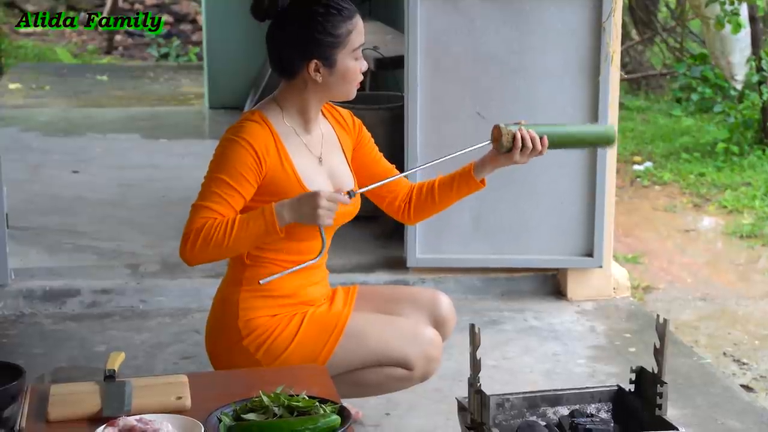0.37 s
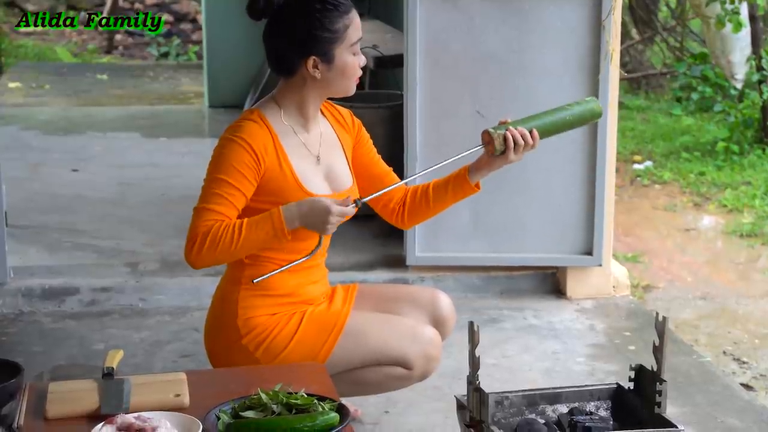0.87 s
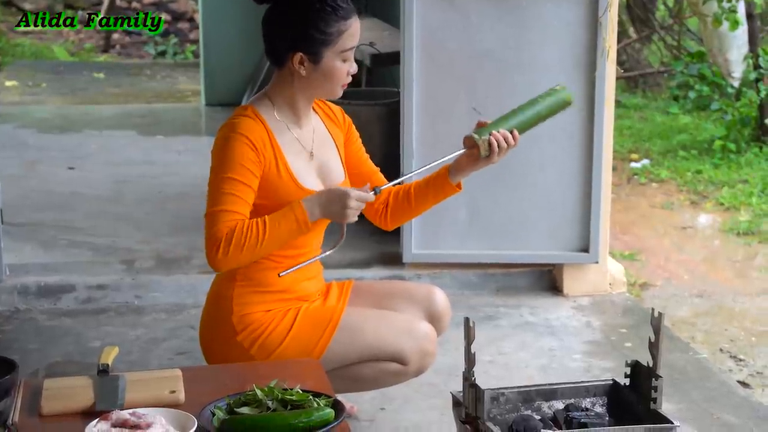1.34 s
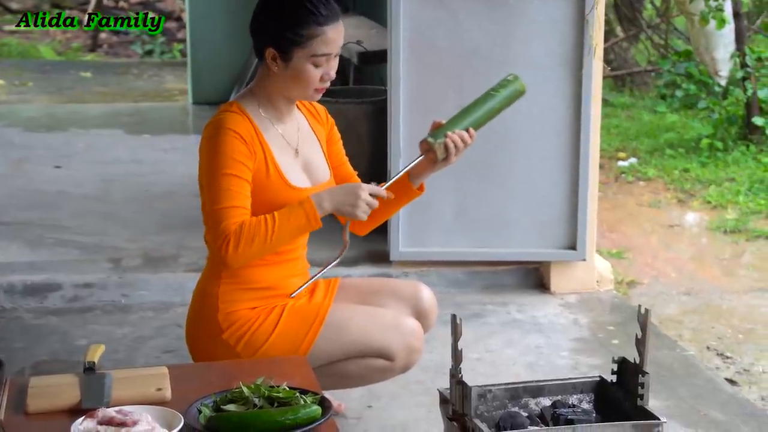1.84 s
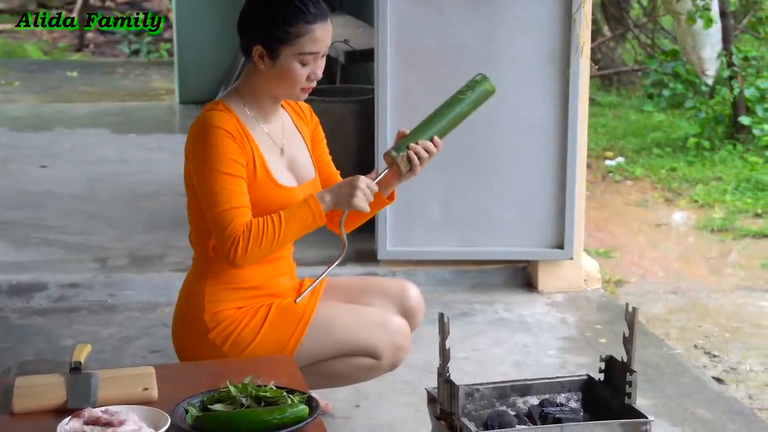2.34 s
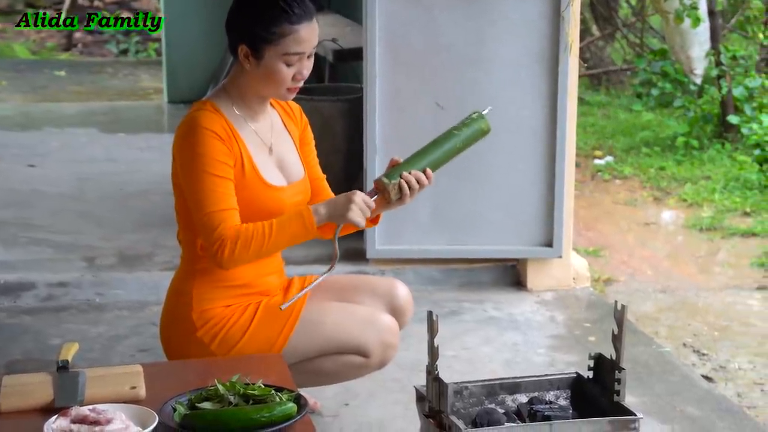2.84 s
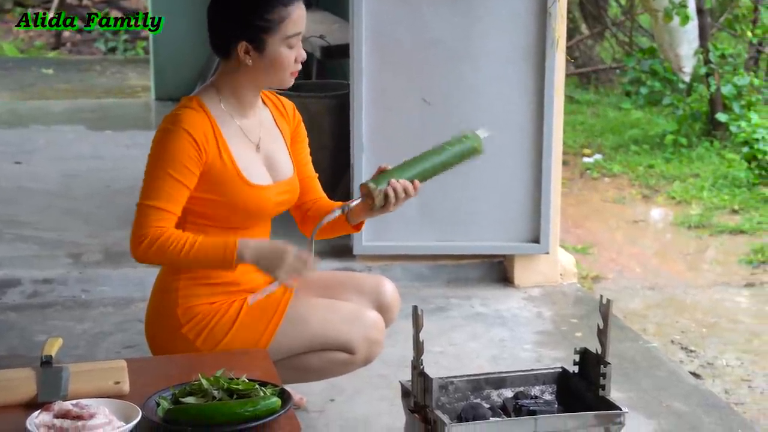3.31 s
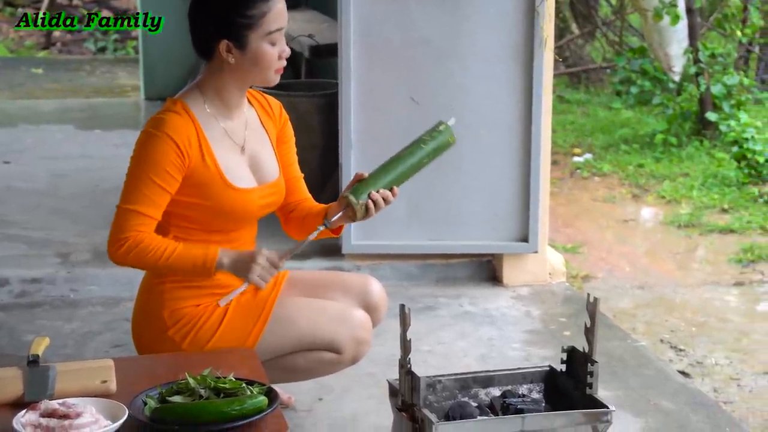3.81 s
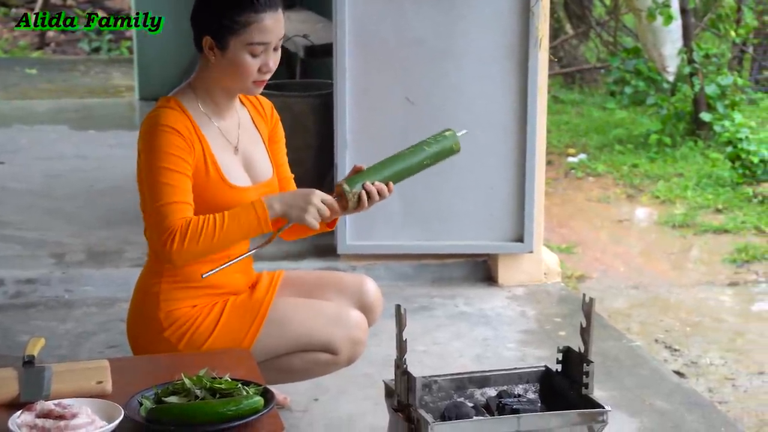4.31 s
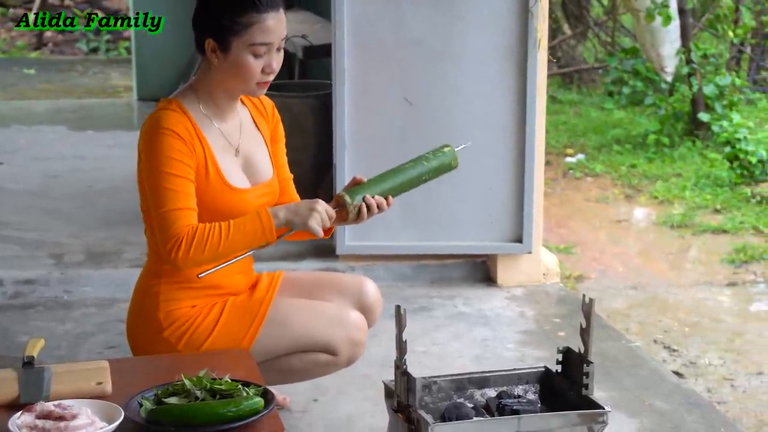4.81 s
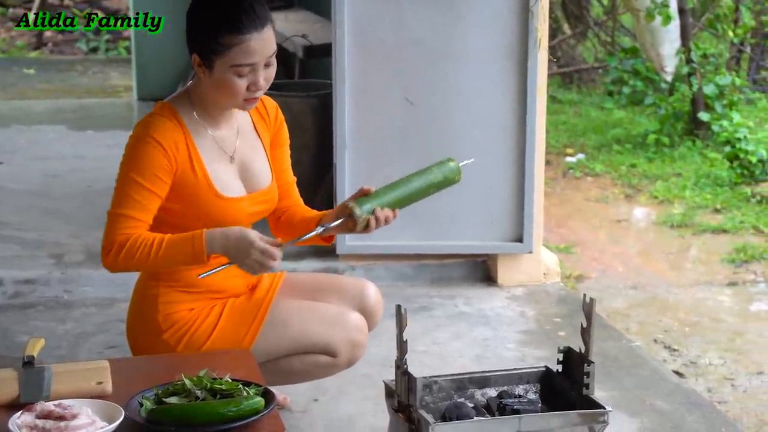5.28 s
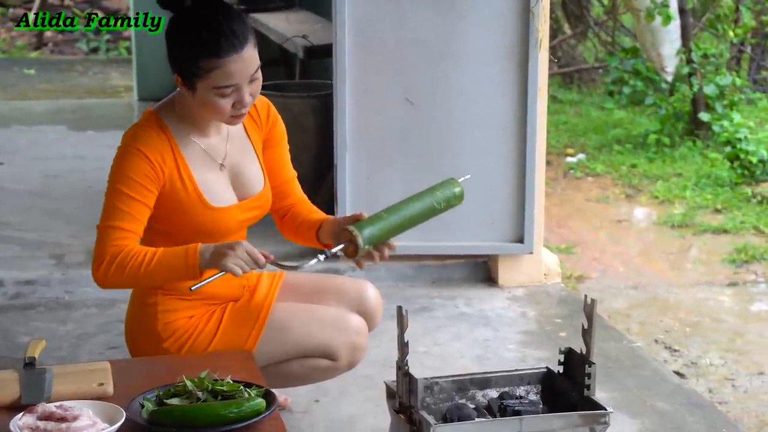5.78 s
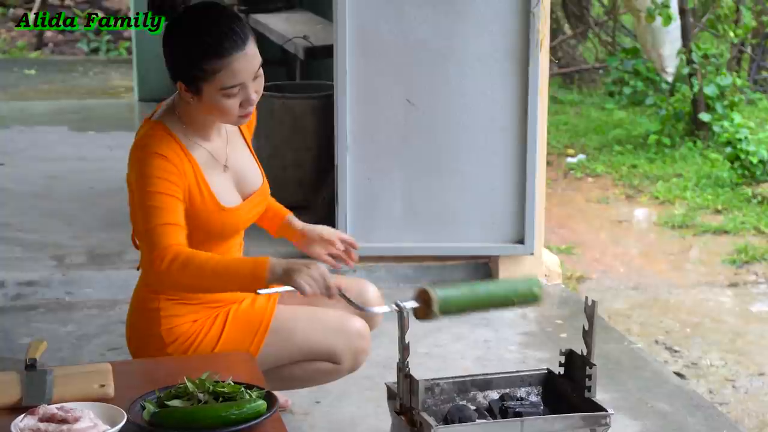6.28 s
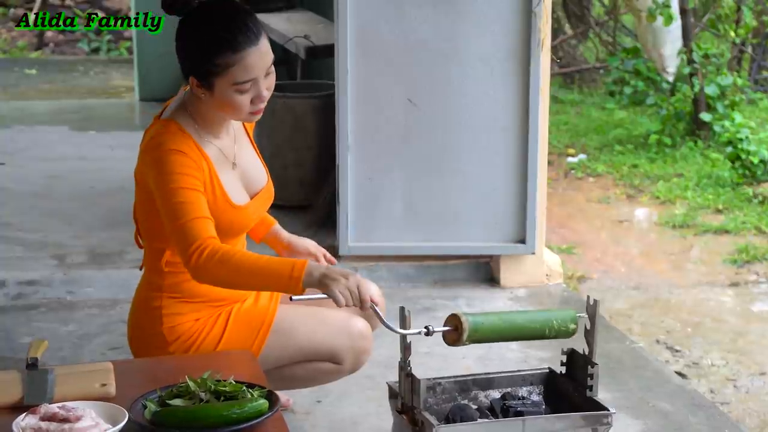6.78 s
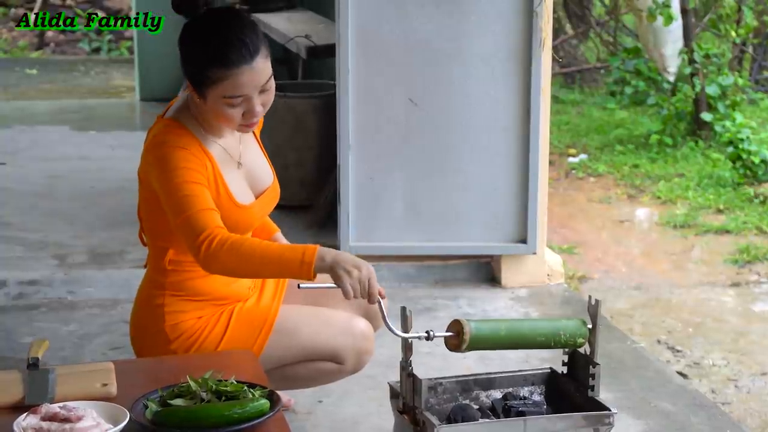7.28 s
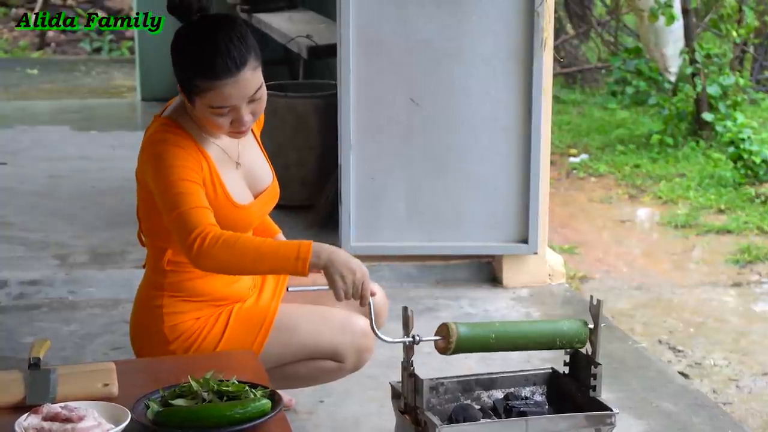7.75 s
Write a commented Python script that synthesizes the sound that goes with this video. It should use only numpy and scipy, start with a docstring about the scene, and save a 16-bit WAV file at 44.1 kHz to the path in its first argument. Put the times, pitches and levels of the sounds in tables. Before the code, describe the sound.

A skewer knocks hollowly into a bamboo tube, then lands clattering on a thin steel rack, amid birds, insects and a distant rooster.

```python
"""Under a concrete porch open to a garden, close to the microphone: a steel skewer is pushed into a green bamboo
tube, knocking inside it, and the pair is set down on a thin steel rack; rattling contacts ring decaying modes.
Among the trees small birds swoop, buzz, slur and chip as gliding, trilled near-pure tones. Far off a rooster crows
in hoarse partials. Insects sing in two narrow noise bands over a soft outdoor hush of shaped, swelling noise.
Echo tails of noise set the near blows, the trees and the rooster each in a space of its own."""
import sys
import numpy as np
from scipy import signal
from scipy.fft import rfft, irfft
from scipy.io import wavfile
from scipy.ndimage import uniform_filter1d

SR = 44100
rng = np.random.default_rng(int(sys.argv[2]) if len(sys.argv) > 2 else 0)


def volts(x):
    """Linear amplitude factor 10**(x/20) for a level x in dB, scalar or array-like."""
    e = np.asarray(x, float) / 20
    return 10 ** e


def dump_mix(stems):
    """Bounce the given channels to the path in sys.argv[1] as a 16-bit WAV at rate SR."""
    frames = np.atleast_2d(stems).T  # one column per channel
    limited = np.clip(frames, -1, 1)  # hard clip at full scale
    pcm = np.round(limited * 32767).astype(np.int16)
    wavfile.write(sys.argv[1], SR, pcm)


N = 347508  # samples

# Levels of blows and calls are relative: distance, echo and radiation still act on them.
# outdoor hush, spectrum of the mid signal: (f/Hz, relative level/dB)
HUSH_SPECTRUM = [(20, -31), (60, -27), (157, -19.5), (293, -9.5), (863, 1), (1650, 0), (5730, -8.5),
                 (7920, -9.5), (10700, -15.5), (14800, -18), (16500, -28)]
# width of the hush: (f/Hz, side minus mid/dB)
HUSH_WIDTH = [(30, -48), (250, -7.5), (1000, -5), (4000, -3), (12000, -1.5)]
# swells of the lower insect chorus: (t/s of the crest, level/dB over its quiet level)
INSECT_SWELLS = [(1.02, 5.5), (2.15, 7), (3.58, 3.5), (4.95, 3), (5.72, 5.5), (6.35, 2.5), (7.5, 4)]
# soft hollow taps of a hand on the tube: (t/s, level/dB, favoured f/Hz, hardness/dB per octave,
# toneless scuff against the ring/dB)
HAND_TAPS = [(0.288, -39.5, 1080, 4, 6.5), (2.631, -39.5, 780, 2.5, 1.6), (5.951, -41, 835, 4, 5.9),
             (6.635, -37.5, 1860, 2, 4.3), (6.713, -45.5, 1400, 5, 4.4)]
# skewer on bamboo: same columns as the taps
SKEWER_KNOCKS = [(1.237, -37.5, 3840, -4.5, -21), (1.51, -43, 1600, 5, -14), (1.545, -39.5, 5450, 10, 2),
                 (1.556, -31, 2650, -16, -12), (1.571, -30, 2650, -12, -10), (1.681, -51, 1600, 2, 0),
                 (1.733, -35.5, 2840, -7.5, -8), (2.012, -25.5, 3680, -2.5, -9),
                 (2.212, -22, 2230, -1.5, -4), (2.421, -35.5, 1686, -0.5, -11),
                 (3.812, -42.5, 1570, -3, -12), (4.051, -37.5, 1540, -14, -7), (5.259, -33, 1635, -15, 3),
                 (5.654, -33, 1660, -1, -14)]
# modes of the bamboo tube: (f/Hz, level/dB, t60/s)
BAMBOO_MODES = [(815, -2, 0.052), (1330, -32, 0.022), (1581, -1, 0.045), (1636, 1.5, 0.036),
                (1818, 3.5, 0.024), (2230, -7.5, 0.052), (2650, -3, 0.036), (2727, 0, 0.026),
                (3144, -2, 0.018), (3420, -2, 0.023), (3670, -8, 0.019), (4610, 1, 0.017),
                (5450, -10, 0.02), (9100, -6, .015), (11160, -7, 0.012)]
# small bright ticks of metal: (t/s, level/dB)
METAL_TICKS = [(2.075, -49), (2.818, -49), (3.676, -54), (3.822, -47), (6.409, -39.5), (6.469, -49),
               (6.52, -47)]
# modes of a tick: (f/Hz, level/dB, t60/s)
TICK_MODES = [(5200, 3, 0.0037), (9970, -1, .015), (14800, -25, 0.0033)]
# tube and skewer landing on the bars of the rack: same columns as the taps
BAR_LANDINGS = [(6.976, -31.5, 2650, 1.2, 4.8), (7.071, -20, 3850, 0.5, 5), (7.169, -33, 4530, -3.5, 3.8),
                (7.301, -29, 3420, -2.5, 9.6), (7.763, -28, 2300, -7.5, 3.9), (7.801, -43, 2270, -3, 1.5)]
# modes of the steel bars: (f/Hz, level/dB, t60/s)
BAR_MODES = [(1200, -20, .015), (1970, -24, 0.022), (2260, -21, 0.044), (2300, -5, 0.016), (2650, 3, 0.029),
             (3420, -25, 0.017), (3750, -1, 0.027), (3850, 3.5, 0.04), (4060, -15, 0.017), (4730, -9, 0.02),
             (4560, 0, 0.027), (5120, -13, 0.018), (7900, 4, 0.026), (8900, -12, 0.014), (9980, 4, 0.022),
             (11700, -23, .012)]
# frame of the rack booming under the landings: (t/s, level/dB, favoured f/Hz, hardness/dB per octave)
FRAME_BOOMS = [(6.975, -38, 875, 5), (7.071, -36.5, 507, -3), (7.17, -40, 335, -8), (7.298, -39, 410, 0),
               (7.764, -29.5, 555, 5.5)]
# modes of the frame: (f/Hz, level/dB, t60/s)
FRAME_MODES = [(340, -14, 0.069), (410, -18, 0.056), (486, 3, 0.044), (552, 10.5, 0.032), (640, -11, 0.03),
               (793, 0, 0.045), (875, 6.5, 0.034)]
# buzzing calls: (t/s, level/dB, length/s, pitch factor, lift of the opening note/share of pitch)
BUZZ_CALLS = [(0.673, -52.5, 0.25, 0.96, 0.0264), (4.555, -41, .28, 0.96, 0.011)]
# slurred calls: same columns as the buzzes
SLUR_CALLS = [(2.63, -44, .21, 1.01, 0.009)]
# swooping calls: (t/s, level/dB, length of the full shape/s, lift of the opening note/share of pitch,
# share of the shape that is sung)
SWOOP_CALLS = [(1.902, -42.5, 0.22, 0.044, 1), (3.372, -42.5, 0.24, 0.0097, 1),
               (5.48, -42.5, 0.24, -0.018, .76), (7.394, -42.5, 0.235, -.07, 0.9)]
# chips: (t/s, level/dB, pitch factor)
CHIP_CALLS = [(3.175, -46.5, 1.02), (3.816, -47, 0.93), (4.295, -44.5, 1.01), (4.81, -43.5, 0.97),
              (5.13, -44.5, 0.96), (6.245, -43, 1.01), (6.819, -43.5, 0.94), (7.335, -42, 0.92)]
# call shapes: (place/share of length, f/Hz before the pitch factor, level/dB against the call)
BUZZ_SHAPE = [(0, 5200, -10), (.06, 5200, 8), (.2, 4500, 3), (.45, 4500, 2.5), (.58, 5550, 4.5),
              (.72, 4770, 1), (.9, 4240, -5.5), (1, 4360, -24)]
SWOOP_SHAPE = [(0, 6700, 5.5), (0.061, 6694, -3.5), (0.202, 6140, 2), (0.399, 5003, -4), (.55, 5044, -7),
               (.72, 5900, 5.5), (.83, 7050, 3.5), (.95, 7000, -14.5), (1, 7550, -45)]
SLUR_SHAPE = [(0, 5500, -3), (.1, 5200, 0.5), (.35, 4790, 3), (.65, 5000, -6), (1, 4400, -9)]
CHIP_SHAPE = [(0, 7420, 3), (.15, 7000, 3), (.6, 6200, -3), (1, 5200, -5)]
# rooster, lower voice: (t/s, length/s, f/Hz at the crest, level/dB at the crest, crest/share of length)
LOW_CROW = [(4.605, 0.085, 858, -51, 0.53), (4.83, 0.099, 1118, -42.5, 0.39),
            (5.035, .44, 1120, -43.5, .55), (5.685, 0.094, 855, -49, .3), (5.78, .11, 860.6, -45, 0.7)]
# rooster, upper voice: same columns; the row at 4.85 s is no upper-voice note but the lower voice's 4.83 s note
# an octave up, strengthening its second partial
HIGH_CROW = [(4.63, .09, 2000, -53, 0.43), (4.85, 0.11, 2190, -52, .3), (4.935, 0.058, 2076, -44.5, 0.36),
             (5.035, .2, 2000, -42, 0.19), (5.3, 0.2, 2030, -42, 0.73), (5.6, 0.23, 2025, -51, 0.66),
             (5.96, .13, 2095, -51, 0.21)]

WOBBLE = 0.022  # pitch unsteadiness of the birds, share of pitch
SWELL_RISE_S, SWELL_FALL_S = 0.32, 0.42  # insect swells
CROW_ATTACK_S, CROW_RELEASE_S = 0.0055, 0.014
CROW_SWELL_DB = 8.5  # the ends of a note lie this far under its crest
# each note trails off thinly; the third partial holds on better
CROW_TRAIL_S, CROW_TRAIL_DB, CROW_TRAIL_THIRD_DB = 0.25, -13, 1
CROW_REST_HZ = 855  # pitch towards which the lower voice sags
THROAT_HZ, THROAT_WIDTH_HZ = 2550, 180  # the third partial sounds only inside this resonance


def table(rows, hz):
    """Read (Hz, dB) points on a log-frequency axis."""
    f, db = np.transpose(rows)
    return np.interp(np.log(hz + 1), np.log(f), db)


def band(x, hz, width):
    """Bell-shaped band around hz."""
    f = np.arange(N // 2 + 1) * SR / N
    return irfft(rfft(x) * np.exp(-0.5 * ((f - hz) / width) ** 2), N)


def unit(x):
    """Scale to rms 1."""
    return x / np.sqrt(np.mean(x ** 2))


def walk(rate, size=N):
    """Smooth random wander of spread near 1, about rate new values a second."""
    k = max(int(SR / rate), 2)
    steps = np.repeat(rng.standard_normal(size // k + 1), k)
    return 1.283 * uniform_filter1d(uniform_filter1d(steps, k), k)[:size]


def pan(x, db):
    """Two channels, the left louder than the right by db."""
    return x * volts(np.array([[db / 2], [-db / 2]]))


def space(x, t60, treble_t60, wet_db, alike, gap):
    """Direct sound plus a dense echo tail, treble and bass dying apart; alike = share common to both channels."""
    t = np.arange(int(0.9 * SR)) / SR
    noise = rng.standard_normal((3, len(t)))
    noise = np.sqrt(alike) * noise[0] + np.sqrt(1 - alike) * noise[1:]
    low = uniform_filter1d(noise, size=9, axis=1)
    tail = low * volts(-60 * t / t60) + (noise - low) * volts(-60 * t / treble_t60)
    tail = tail * (1 - np.exp(-t / gap))  # the echoes set in over gap seconds
    tail = tail * volts(wet_db) / np.sqrt(np.mean(np.sum(tail ** 2, axis=1)))
    return x + signal.fftconvolve(x, tail, axes=1)[:, :N]


def radiate(x, hz):
    """High-pass at hz: a small object radiates little bass."""
    return signal.sosfilt(signal.butter(6, hz, "high", fs=SR, output="sos"), x)


def blows(rows, modes, favour_db, rattle, scuff_hz, rise):
    """Each blow is a short rattle of contacts; it rings the modes near the spot struck and scuffs tonelessly."""
    out, t = np.zeros(N + SR), np.arange(SR // 4) / SR
    hz, db, t60 = np.transpose(modes)[:, :, None]
    f = np.arange(len(t) // 2 + 1) * SR / len(t) + 1
    push = np.exp(-t / rattle) * (1 - np.exp(-t / rise))  # rattle and rise in seconds
    for s, blow_db, spot_hz, hard_db, scuff_db in rows:
        # modes within about a tenth of an octave of the favoured pitch are lifted
        spot_db = favour_db * np.exp(-(np.log2(hz / spot_hz) / 0.11) ** 2) + hard_db * np.log2(hz / 2000)
        mode_hz = hz * (1 + 0.016 * rng.standard_normal((len(hz), 1)))
        ring = np.sum(volts(db + spot_db - 60 * t / t60) * np.sin(2 * np.pi * mode_hz * t), axis=0)
        # about 2500 random contacts a second, and one firm one
        touching = rng.random(len(t)) < 2500 / SR
        contacts = rng.standard_normal(len(t)) * touching * push * 0.2
        contacts[int(rise * SR)] = 0.55
        # the scuff: a broad hump of noise as long as the rattle, tilted by the hardness
        resonance = np.abs(1 + 1j * 0.74 * (f / scuff_hz - scuff_hz / f)) ** 2
        hump = volts(hard_db * np.log2(f / 2000)) / resonance
        scuff = irfft(rfft(rng.standard_normal(len(t))) * hump, len(t)) * push
        hit = unit(signal.fftconvolve(ring, contacts)[:len(t)]) + volts(scuff_db) * unit(scuff)
        i = int(s * SR)
        out[i:i + len(t)] += volts(blow_db) * hit / np.sqrt(1 + volts(2 * scuff_db)) / 10
    return out[:N]


def birds(rows, shape, trill_hz, trill_depth, wobble):
    """Near-pure whistles after one shape; a fast trill of the pitch turns a whistle into a buzz."""
    out = np.zeros(N)
    share, hz, db = np.transpose(shape)
    for s, call_db, length, factor, lift, sung in rows:
        size = int(min(sung, 1) * length * SR)
        u = np.arange(size) / (length * SR)  # place in the shape
        trill = trill_depth * np.sin(2 * np.pi * trill_hz * length * u)
        bend = lift * np.exp(-u / 0.22) + trill + wobble * walk(300, size=size)
        pitch = factor * np.interp(u, share, hz) * (1 + bend)
        tone = np.sin(2 * np.pi * np.cumsum(pitch) / SR)
        i = int(s * SR)
        out[i:i + size] += np.sqrt(2) * tone * volts(call_db + np.interp(u, share, db))
    return pan(out, 0)


def hush():
    """Leaves and distant air: octave bands that swell together and flicker alone, alike left and right in the bass."""
    f = np.arange(N // 2 + 1) * SR / N
    mid, side = rfft(rng.standard_normal((2, N))) * volts(table(HUSH_SPECTRUM, f))
    side = volts(table(HUSH_WIDTH, f)) * side
    pair = np.array([mid + side, mid - side])
    out, swell = 0, walk(1.0)
    for k in range(10):  # overlapping bands, octaves up from 30 Hz
        share = np.clip(1 - np.abs(np.log2((f + 1) / 30) - k), 0, 1)
        out = out + irfft(pair * share, N) * volts(0.4 * swell + 1.0 * walk(8))
    return unit(out) * volts(-50)


def insects():
    """Two choruses as narrow rasping bands, unrelated left and right; the lower swells quickly and ebbs slowly."""
    t = np.arange(N) / SR
    swell_db = 0
    for s, db in INSECT_SWELLS:
        swell_db = swell_db + db * np.exp(-((t - s) / np.where(t < s, SWELL_RISE_S, SWELL_FALL_S)) ** 2)
    out = np.zeros((2, N))
    for c, side_db in enumerate((0.7, -0.7)):
        low_db = -59.5 + swell_db + 1.0 * walk(60) + 0.83 * walk(3.67)
        low = unit(band(rng.standard_normal(N), 6910, 244)) * volts(low_db)
        high = unit(band(rng.standard_normal(N), 9510, 580)) * volts(-61 + 1.2 * walk(30))
        out[c] = (low + high) * volts(side_db)
    return out


def crackle():
    """Faint pricks of treble scattered at random, about five a second, ringing the modes of a tick."""
    chance = rng.random((40, 2))
    rows = [(s * (N / SR - 1 / 4), -60 + 9 * size ** 2, 10000, 0, 10) for s, size in chance]
    return radiate(blows(rows, TICK_MODES, 0, 0.009, 13000, 0.0033), 7000)


def taps():
    """A hand taps the tube softly: a very short rattle rings mostly the modes near the favoured pitch."""
    return radiate(blows(HAND_TAPS, BAMBOO_MODES, 24, 0.0019, 1040, 0.004), 390)


def buzzes():
    """A deep pitch trill, too fast to follow, roughens the whistle into a buzz."""
    return birds([(*call, 1) for call in BUZZ_CALLS], BUZZ_SHAPE, 150, 0.085, WOBBLE)


def knocks():
    """The skewer rattles inside the bamboo and rings the tube's short modes."""
    return radiate(blows(SKEWER_KNOCKS, BAMBOO_MODES, 13.2, 0.01, 2670, 0.002002), 1220)


def swoops():
    """A whistle dips and climbs again, with a shallow trill."""
    rows = [(s, db, length, 1, lift, sung) for s, db, length, lift, sung in SWOOP_CALLS]
    return birds(rows, SWOOP_SHAPE, 70.8, 0.0044, WOBBLE / 2)


def ticks():
    """Small touches of metal ring a few high modes."""
    rows = [(s, db, 10000, 0, 3) for s, db in METAL_TICKS]
    return radiate(blows(rows, TICK_MODES, 0, 0.012, 7300, 0.0019), 2700)


def slurs():
    """A sliding whistle roughened by a deep, fast trill."""
    return birds([(*call, 1) for call in SLUR_CALLS], SLUR_SHAPE, 140, 0.085, WOBBLE)


def chips():
    """Falling whistles of 28 ms, too short for the trill to be followed."""
    rows = [(s, db, 0.028, factor, 0, 1) for s, db, factor in CHIP_CALLS]
    return birds(rows, CHIP_SHAPE, 88, 0.0048, WOBBLE)


def voice(notes, sag, second_db, third_db):
    """Hoarse notes of one half of the voice box: each swells, breaks off and trails away, jittering and throbbing."""
    out = np.zeros(N)
    for s, length, hz, db, crest in notes:
        t = np.arange(int((length + CROW_TRAIL_S) * SR)) / SR
        crest_s = np.clip(crest, 0.05, 0.95) * length
        slack = np.interp(t, [0, crest_s, length], [1, 0, 1])  # 0 at the crest, 1 at the ends
        pitch = hz - sag * slack * (hz - CROW_REST_HZ)
        phase = 2 * np.pi * np.cumsum(pitch * (1 + 0.019 * walk(320, size=len(t)))) / SR
        trailing = np.clip((t - length) / CROW_RELEASE_S, 0, 1)
        edges = np.clip(np.minimum(t / CROW_ATTACK_S, (t[-1] - t) / CROW_RELEASE_S), 0, 1)
        throat = np.exp(-0.5 * ((3 * pitch - THROAT_HZ) / THROAT_WIDTH_HZ) ** 2)
        tone = volts(CROW_TRAIL_DB * trailing) * (np.sin(phase) + volts(second_db) * np.sin(2 * phase))
        tone = tone + volts(third_db + CROW_TRAIL_THIRD_DB * trailing) * throat * np.sin(3 * phase)
        level_db = db - CROW_SWELL_DB * slack + 2.95 * walk(45.6, size=len(t))
        i = int(s * SR)
        out[i:i + len(t)] += np.sqrt(2) * tone * edges * volts(level_db)
    return out


def rooster():
    """Hoarse syllables from the lower half of the voice box, with the purer upper half sounding across them."""
    return voice(LOW_CROW, 0.4, -10, -8) + voice(HIGH_CROW, 0, -30, -30)


def frame():
    """The frame of the rack booms low under the landings."""
    rows = [(s, db, hz, hard_db, -4.5) for s, db, hz, hard_db in FRAME_BOOMS]
    return radiate(blows(rows, FRAME_MODES, 7.9, 0.021, 550, 0.00801), 313)


def bars():
    """Tube and skewer land on the steel bars, which ring briefly and brightly."""
    return radiate(blows(BAR_LANDINGS, BAR_MODES, 4.7, 0.0045, 3340, 0.001), 1560)


def scene():
    """Near blows under the porch roof, birds among the trees, a far rooster, the background around."""
    near = pan(taps() + knocks(), 0.37) + pan(crackle() + ticks() + frame() + bars(), 0.56)
    trees = buzzes() + swoops() + slurs() + chips()
    porch = space(near, 0.34, 0.23, wet_db=3.1, alike=0.74, gap=0.00048)
    garden = volts(-9.5) * space(trees, 0.36, 0.54, wet_db=8, alike=0.2, gap=0.0018)
    far = space(pan(rooster(), -4.5), 0.65, 0.69, wet_db=-1, alike=0.54, gap=0.0061)
    return hush() + insects() + porch + garden + far


def roll_off(x):
    """The treble ends steeply here."""
    return signal.sosfilt(signal.butter(12, 15790, fs=SR, output="sos"), x)


def record(dry):
    """The finished mix of near, garden and far sounds, as it leaves the camera."""
    return roll_off(dry)


dry = scene()
out = record(dry)
dump_mix(out)
```